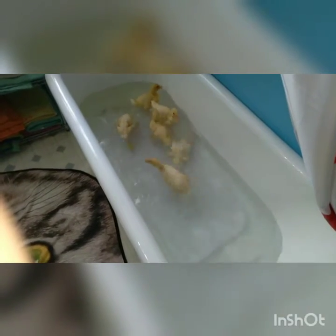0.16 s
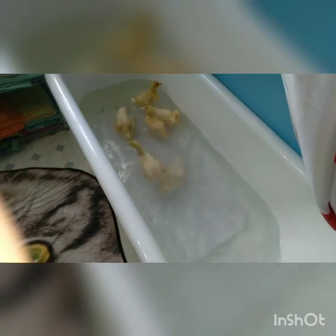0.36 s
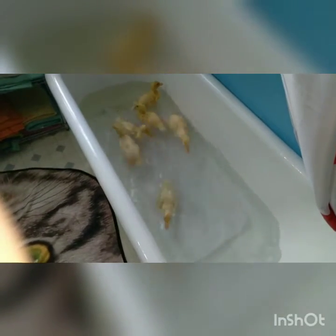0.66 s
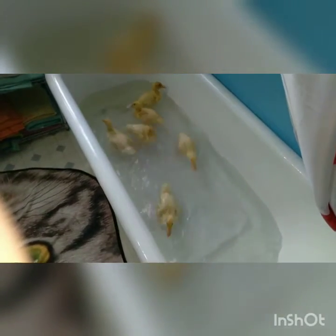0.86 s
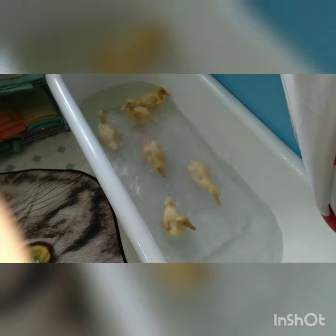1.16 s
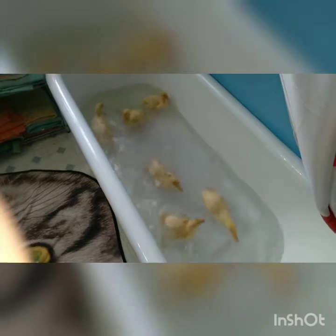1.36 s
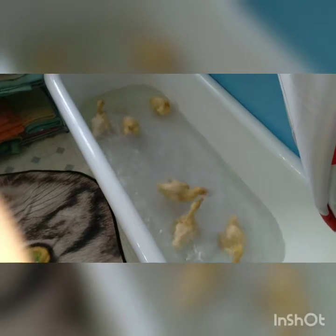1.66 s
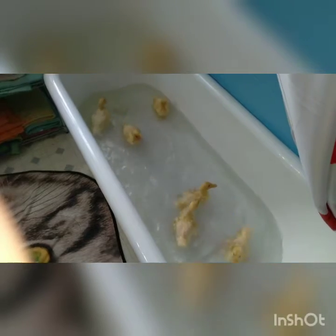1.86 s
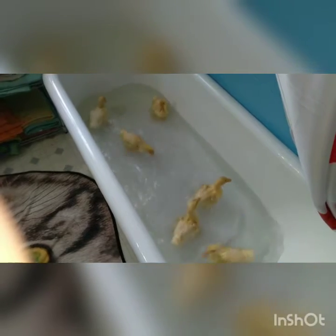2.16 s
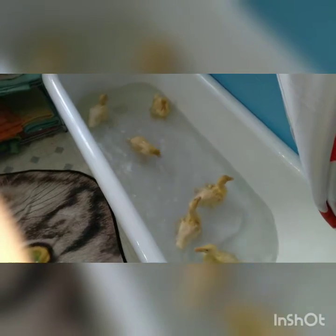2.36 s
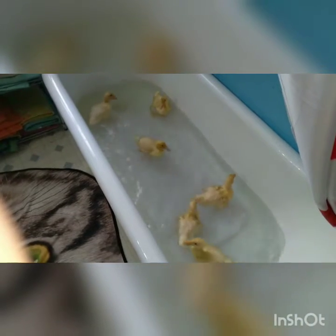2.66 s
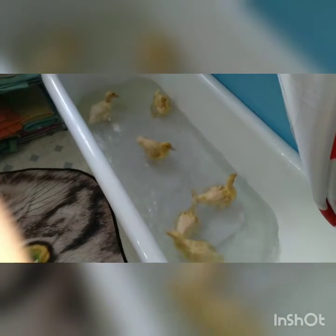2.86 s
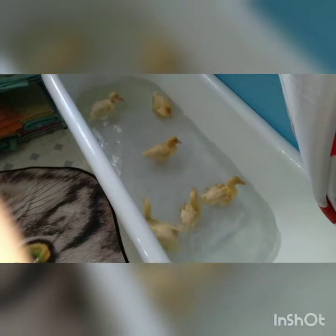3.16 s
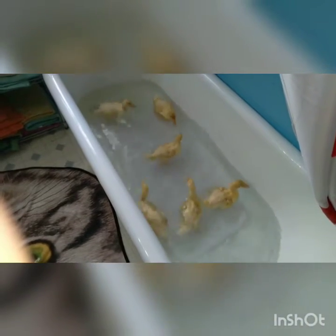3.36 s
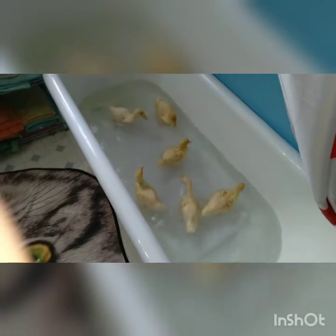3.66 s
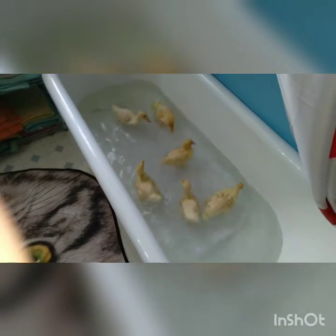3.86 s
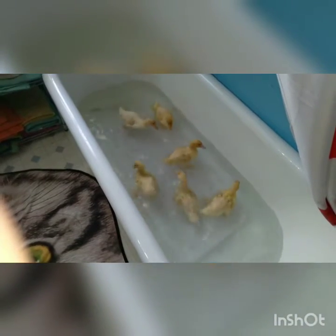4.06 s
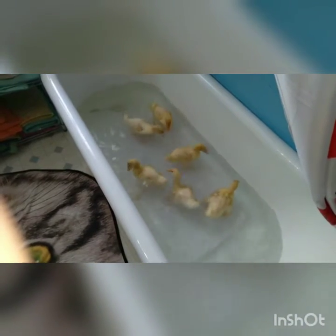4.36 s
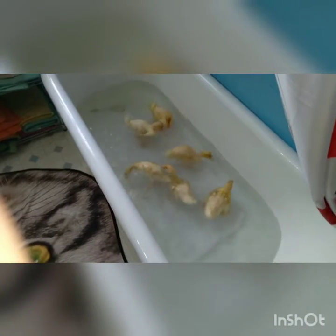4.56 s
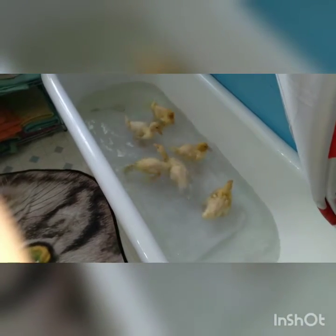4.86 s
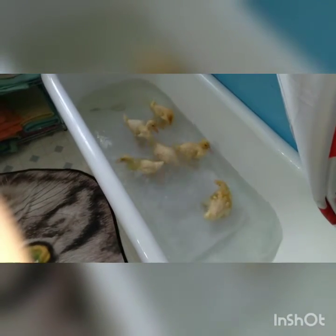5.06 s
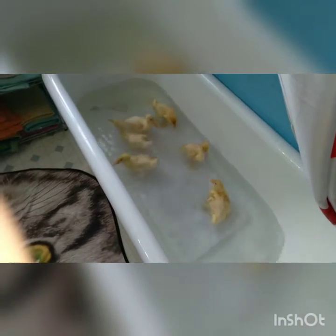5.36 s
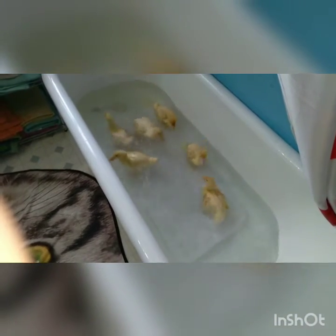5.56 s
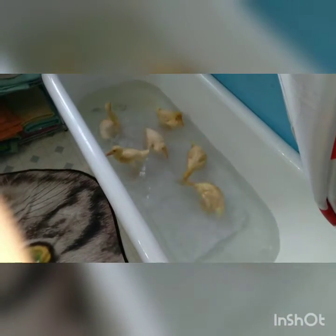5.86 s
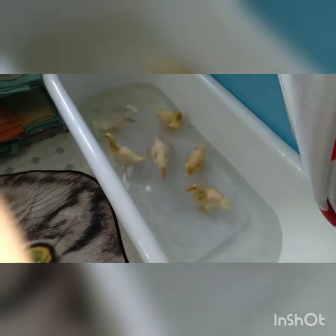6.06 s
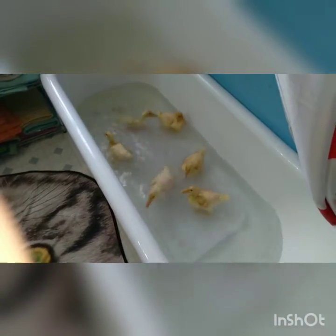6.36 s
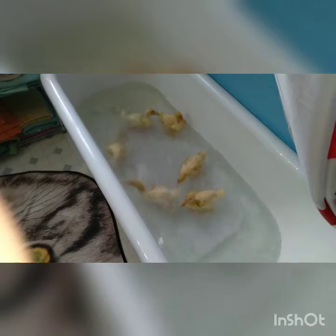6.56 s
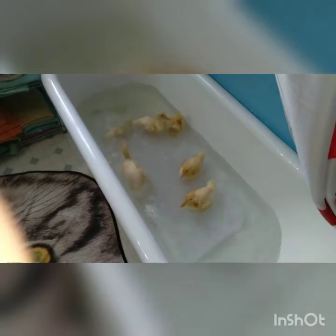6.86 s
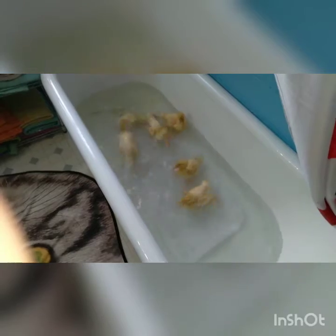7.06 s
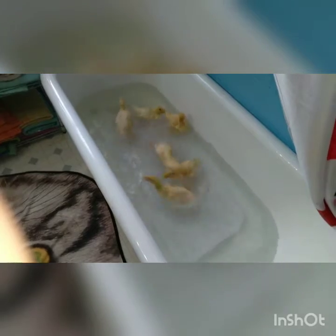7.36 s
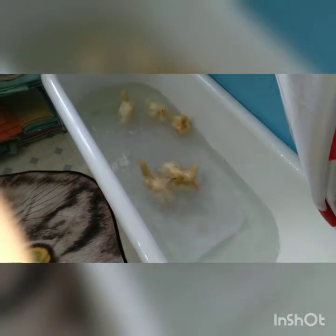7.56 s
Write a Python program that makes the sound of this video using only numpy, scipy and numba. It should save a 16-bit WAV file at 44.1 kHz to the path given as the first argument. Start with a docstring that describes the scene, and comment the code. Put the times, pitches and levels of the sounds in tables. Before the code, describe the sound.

Ducklings peep in short high whistles while paddling and splashing in a shallow bathtub, in a small echoing bathroom.

```python
"""Ducklings peep and splash close by, in a shallow bath in a small hard-walled bathroom.
Each peep is a short whistle that arches up and down in pitch and reaches the pair of microphones
mostly off the walls. Webbed feet throw spray, stir bubbles and kick the water until the tub booms;
single drops smack or plop on the surface. A faint room hush lies underneath."""
import sys
import numpy as np
from scipy import signal
from scipy.fft import rfft, irfft, next_fast_len
from scipy.io import wavfile
from scipy.ndimage import map_coordinates
from numba import njit

SR = 44100
rng = np.random.default_rng(int(sys.argv[2]) if len(sys.argv) > 2 else 0)


def inscribe(sig):
    """Save sig as 16-bit PCM at rate SR to the path in sys.argv[1].

    A 1-D sig is mono; a 2-D sig holds one channel per row.
    Samples are clipped to [-1, 1] before scaling.
    """
    pcm = np.round(np.clip(np.atleast_2d(sig).T, -1, 1) * 32767)
    wavfile.write(sys.argv[1], SR, pcm.astype(np.int16))


N = 339646
TIME = np.arange(N) / SR

# colour of the room's hush: freq_hz, density_db
HUSH_SPECTRUM = [(40, 5), (110, 7), (240, 8.5), (600, -8), (16000, -47)]
# how long the bathroom rings: freq_hz, t60_s
ROOM_DECAY = [(150, 0.67), (2500, 0.27), (12000, 0.25)]
# resonances of the hollow tub: freq_hz, gain_db
TUB_RESONANCES = [(151, 8), (640, 8)]
# the two microphones hear the tub differently: freq_hz, left_minus_right_db
MIC_TILT = [(550, 0.5), (1400, -3), (2900, -4.5), (5500, 5.5), (9000, -4)]
# deep kicks of the feet: start_s, level_db, hold_s
DEEP_KICKS = [(0.013, -39.5, 0.067), (0.713, -47, 0.23), (1.308, -46.5, 0.28), (3.177, -51.5, 0.11),
              (6.195, -48.5, 0.061), (6.55, -39, 0.065), (6.861, -49, 0.2), (7.396, -43, 0.074)]
# colour of the air pockets kicked under: pitch_hz, density_db
BOOM_SPECTRUM = [(55, -16), (100, -6.5), (150, 0), (300, -4.5), (700, -8.5)]
# restless water between bouts of paddling: time_s, fizz_db, bubbling_db
RESTLESS_WATER = [(0.0, -40, -44.5), (1.9, -43, -50.5), (2.22, -49.5, -77.5), (2.5, -64, -59.5),
                  (2.71, -63.5, -88.5), (3.1, -45.5, -62.5), (3.62, -54.5, -50.5), (3.84, -60, -64.5),
                  (4.55, -54, -78.5), (5.3, -40.5, -49), (5.85, -57.5, -71), (6.45, -37.5, -48.5),
                  (7.7, -35.5, -44.0)]
# bouts of paddling: start_s, length_s, spray_db, bubbles_db
PADDLING_BOUTS = [(0.0, 0.12, -35, -45.5), (0.213, 0.08, -33.5, -36.5), (0.472, 0.053, -37.5, -39),
                  (0.641, 0.082, -30.5, -36.5), (1.125, 0.18, -31.5, -38.5), (1.256, 0.32, -31, -41.5),
                  (1.65, 0.13, -37.5, -43), (3.031, 0.09, -36.5, -54.0), (3.124, 0.06, -33.5, -40.5),
                  (3.257, 0.096, -40.5, -44), (3.888, 0.029, -42.5, -76.5), (4.83, 0.16, -43, -59),
                  (5.067, 0.037, -38.5, -48), (5.476, 0.2, -46.5, -56), (5.976, 0.17, -43, -48.5),
                  (6.156, 0.015, -36, -40.5), (6.55, 0.17, -33, -38.5), (6.829, 0.11, -30, -36.5),
                  (7.218, 0.032, -31.5, -36), (7.314, 0.28, -34, -39)]
# colour of the spray: pitch_hz, density_db
SPRAY_SPECTRUM = [(1200, -13.5), (2200, -2), (4300, -4.5), (6500, -9), (10000, -0.5), (13000, -14),
                  (16000, -21)]
# colour of the stirred bubbles: pitch_hz, density_db
FROTH_SPECTRUM = [(380, -11), (650, -5), (1100, -3.5), (2400, -5.5)]
# single large bubbles: start_s, start_pitch_hz, level_db
LARGE_BUBBLES = [(0.111, 1140, -21.5), (0.224, 1944, -18.5), (0.683, 1550, -20), (1.289, 1580, -15),
                 (1.83, 4040, -21.5), (2.449, 616, -31), (3.177, 2262, -17), (5.381, 1790, -21),
                 (7.068, 1273, -19), (7.247, 598, -28.5), (7.347, 1200, -22.5), (7.47, 1897, -15.5),
                 (7.490, 1383, -18.5), (7.577, 2640, -14)]
# drops and feet hitting the water: start_s, level_db, centre_hz
SURFACE_HITS = [(0.049, -24, 10800), (0.231, -18.5, 9400), (0.474, -18.5, 4170), (0.647, -21.5, 5560),
                (0.707, -17, 8265), (1.351, -20, 8550), (1.5215, -13, 6800), (3.135, -18.5, 2380),
                (4.831, -11.5, 10200), (5.028, -10.5, 9950), (5.104, -17.5, 7750), (5.339, -23.5, 5800),
                (5.382, -21.5, 9690), (6.555, -18.5, 10010), (6.65, -18, 9970), (6.716, -15, 9400),
                (6.8325, -15, 9325), (7.247, -11.5, 9750)]
# the calls, levels ahead of the throat's resonance: crest_s, crest_hz, level_db, beak_opening (0-1)
CALLS = [(0.02, 3340, -25.5, 0.67), (0.075, 3072, -24, 0.09), (0.263, 3146, -26.5, 0),
         (0.798, 3004, -23.5, 0.16), (1.033, 3507, -22, 1), (1.243, 2610, -21, 0.41),
         (1.382, 3092, -18.5, 0.6), (1.575, 3356, -18, 1), (1.922, 2457, -35, 0.17),
         (2.008, 3600, -32.5, 0.05), (2.083, 3540, -32, 0), (2.215, 2652, -30, 0.11),
         (2.285, 3426, -30.5, 0.12), (2.615, 2870, -38, 0.05), (2.785, 3080, -38, 0.04),
         (2.822, 2950, -31.5, 0.06), (2.98, 2850, -30, 0), (3.124, 3110, -26.5, 0.09), (3.57, 2594, -38, 0),
         (3.686, 2900, -27, 0.03), (3.749, 3018, -34.5, 0.69), (3.913, 3123, -28.5, 0.01),
         (4.101, 2820, -23.5, 0.17), (4.277, 3077, -26, 0.17), (4.465, 2325, -37, 0),
         (4.655, 3200, -31, 0.06), (4.74, 2787, -31, 0), (4.925, 2920, -33, 0), (5.182, 2890, -32, 0.14),
         (5.292, 2720, -31.5, 0.37), (5.479, 2914, -28.5, 0.05), (5.52, 2950, -28.5, 0.03),
         (5.661, 2404, -33, 0.05), (5.707, 3020, -33, 0.22), (5.846, 2710, -32, 0.08),
         (5.873, 3205, -36.5, 0.63), (5.964, 2645, -36, 0.02), (6.195, 2670, -34, 0.2),
         (6.674, 3352, -31.5, 0.3), (6.886, 2356, -26, 0.15), (7.184, 2820, -29, 0.1),
         (7.355, 2985, -29, 0.3)]
# how the calling bird reaches the microphones: time_s, direct_power_share (0-1), left_minus_right_db
CALL_PATH = [(1.05, 0.13, -0.5), (1.55, 0.17, -1.5), (2.2, 0.31, -8), (2.7, 0.11, -2.5), (3.7, 0, 6),
             (5.5, 0.19, -3)]


def from_db(db):
    """Decibels to gain."""
    return 10 ** (np.asarray(db) / 20)


def unit_rms(x):
    """Scale to unit power."""
    return x / np.sqrt(np.mean(x ** 2) + 1e-20)


def in_time(rows):
    """Columns of a curve table at every sample."""
    times, *columns = np.transpose(rows)
    return [np.interp(TIME, times, column) for column in columns]


def at_hz(points, hz):
    """Read a table along log frequency."""
    freqs, values = np.transpose(points)
    return np.interp(np.log(np.maximum(hz, 1)), np.log(freqs), values)


def coloured(x, spectrum):
    """Shape a sound with a smooth spectrum."""
    size = next_fast_len(x.shape[-1])
    gain = from_db(at_hz(spectrum, np.fft.rfftfreq(size, 1 / SR)))
    return irfft(rfft(x, size) * gain, size)[..., :x.shape[-1]]


def filtered(x, hz, kind, order=2):
    """Butterworth filter."""
    return signal.sosfilt(signal.butter(order, hz, kind, fs=SR, output="sos"), x)


def add(track, start_s, sound):
    """Mix a sound in from start_s."""
    start = int(round(start_s * SR))
    part = sound[max(-start, 0):max(N - start, 0)]
    track[max(start, 0):max(start, 0) + len(part)] += part


def room_hush(level_db=-70.5):
    """Faint low noise of the room, mostly the same at both microphones."""
    noise = rng.standard_normal(N) + .5 * rng.standard_normal((2, N))
    return from_db(level_db) * unit_rms(coloured(noise, HUSH_SPECTRUM))


def bathroom(places, wet_db, apart_hz=700, echo_s=0.018, lag_s=.00015):
    """From each place to the microphones: direct sound, quick echoes, the tub's ring, the room's tail."""
    t = np.arange(SR // 2) / SR
    edges = np.geomspace(60, SR * .45, 9)
    white = rng.standard_normal((2, len(places), len(t)))
    tail = sum(filtered(white, [lo, hi], "band") * from_db(-60 * t / at_hz(ROOM_DECAY, np.sqrt(lo * hi)))
               for lo, hi in zip(edges, edges[1:]))
    tail *= np.minimum(t / echo_s, 1)
    arrivals = rng.random(white.shape) < 2000 / SR
    echoes = rng.standard_normal(white.shape) * arrivals * np.exp(-t / echo_s)
    mid, side = from_db(wet_db) * (unit_rms(echoes) + unit_rms(tail)) / np.sqrt(2 * len(t))
    side = filtered(side, apart_hz, "high", order=1)   # left and right differ above the bass
    for hz, db in TUB_RESONANCES:
        fade = from_db(-60 * t / at_hz(ROOM_DECAY, hz))
        mid = mid + 2 * from_db(db) * np.cos(2 * np.pi * hz * t) * fade / fade.sum()
    response = np.array([mid + side, mid - side])
    # off-centre places reach the nearer microphone first
    for place, lag in enumerate(np.linspace(-lag_s, lag_s, len(places)) * SR):
        response[0, place, int(max(lag, 0))] += 1
        response[1, place, int(max(-lag, 0))] += 1
    response = unit_rms(response) / np.sqrt(len(t))
    return signal.fftconvolve(places[None], response, axes=2)[..., :N].sum(1)


@njit
def ring_bubbles(starts, pitches, sizes, places, cycles, rise):
    """Each trapped bubble rings down, climbing in pitch as it nears the surface; one track a place."""
    out = np.zeros((places.max() + 1, N))
    for start, hz, size, place in zip(starts, pitches, sizes, places):
        length = int(cycles / hz * SR)
        for i in range(min(length, N - start)):
            age = i / length
            turns = hz * i / SR * (1 + rise * age / 2)
            attack = min(turns / (1 + cycles / 12), 1.)
            out[place, start + i] += size * np.sin(2 * np.pi * turns) * np.exp(-7 * age) * attack
    return out


def bubble_swarm(spectrum, level_db, per_s, cycles, rise, spread_db, clump_db=0, clumps_per_s=0):
    """Bubbles born at random at three places; harder stirring makes more and louder ones."""
    crowd = from_db(.42 * (level_db - level_db.max()))
    starts = np.flatnonzero(rng.random(N) < per_s * crowd / SR)
    low_hz, high_hz = spectrum[0][0], spectrum[-1][0]
    pitches = low_hz * (high_hz / low_hz) ** rng.random(N)[starts]
    sizes = from_db(spread_db * np.minimum(rng.exponential(1, N), 3.4))
    sizes = sizes * rng.choice([-1, 1], N) / np.sqrt(crowd)
    # bubbles near in time and pitch are loud or soft together
    time_and_pitch = [starts / SR * clumps_per_s, 2 * np.log2(pitches)]
    clumps = map_coordinates(rng.standard_normal((1024, 32)), time_and_pitch, order=1)
    sizes = sizes[starts] * pitches * from_db(at_hz(spectrum, pitches) + clump_db * clumps)
    swarm = ring_bubbles(starts, pitches, sizes, np.arange(len(starts)) % 3, cycles, rise)
    return from_db(level_db) * unit_rms(swarm) / np.sqrt(3)


def kicks(fade_db_per_s=110):
    """A deep kick drags big pockets of air under, and the tub booms with them."""
    force = sum(from_db(db - fade_db_per_s * np.maximum(TIME - start_s - hold_s, 0)) * (TIME > start_s)
                for start_s, db, hold_s in DEEP_KICKS)
    pockets = bubble_swarm(BOOM_SPECTRUM, np.zeros(N), per_s=500, cycles=13.5, rise=0.088,
                           spread_db=3, clump_db=-1, clumps_per_s=8.3)
    return bathroom(force * pockets, wet_db=-8.5)


def stirred_db(rest_db, bouts, fade_db_per_s, attack_s=.01):
    """Level of restless water with bouts on top: each swells quickly, holds, then settles."""
    age = np.arange(SR) / SR
    swell = np.minimum(age / attack_s, 1)
    power = from_db(rest_db) ** 2
    for start_s, length_s, db in bouts:
        bout = swell * from_db(db - fade_db_per_s * np.maximum(age - length_s, 0))
        add(power, start_s, bout ** 2)
    return 10 * np.log10(power)


def paddling():
    """Webbed feet throw a crackle of droplets and stir up bubbles; between bouts the water fizzes on."""
    fizz_db, bubbling_db = in_time(RESTLESS_WATER)
    start_s, length_s, thrown_db, trapped_db = np.transpose(PADDLING_BOUTS)
    spray_db = stirred_db(fizz_db, zip(start_s, length_s, thrown_db), fade_db_per_s=104.5)
    froth_db = stirred_db(bubbling_db, zip(start_s, length_s, trapped_db), fade_db_per_s=86)
    spray = bubble_swarm(SPRAY_SPECTRUM, spray_db, per_s=3400, cycles=12.8, rise=0.046,
                         spread_db=2.5, clump_db=4.5, clumps_per_s=60)
    froth = bubble_swarm(FROTH_SPECTRUM, froth_db, per_s=340, cycles=26.2, rise=0.4, spread_db=3)
    return bathroom(spray, wet_db=2.5) + bathroom(froth, wet_db=-0.6)


def plops():
    """Now and then a foot or a drop traps one large bubble."""
    start_s, pitch_hz, level_db = np.transpose(LARGE_BUBBLES)
    starts = (start_s * SR).astype(np.int64)
    places = np.arange(len(starts)) % 3
    rings = ring_bubbles(starts, pitch_hz, from_db(level_db), places, cycles=62., rise=0.466)
    return bathroom(rings, wet_db=0)


def smacks(width_octaves=0.25, skirt_db=-15, decay_s=.0022, low_hz=700):
    """Each hit on the water is a brief splat, strongest around its own pitch, with a weak broad skirt."""
    places = np.zeros((3, N))
    t = np.arange(SR // 20) / SR
    hz = np.geomspace(low_hz, SR / 2, 60)
    for k, (start_s, db, centre_hz) in enumerate(SURFACE_HITS):
        power = np.exp(-(np.log2(hz / centre_hz) / width_octaves) ** 2) + from_db(skirt_db) ** 2
        splat = coloured(rng.standard_normal(len(t)), np.column_stack([hz, 10 * np.log10(power)]))
        add(places[k % 3], start_s, from_db(db) * unit_rms(splat) * np.exp(-t / decay_s))
    return bathroom(filtered(places + 1e-18, low_hz, "high"), wet_db=0.5)


def peep(crest_hz, opening, foot_hz=1700, fall_ratio=0.72, waver=0.013, shimmer_db=0.5, rasp_rad=0.49):
    """A whistle arches through the throat's resonance; an open beak makes it shorter and brighter."""
    rise_s = .0335 * np.sqrt((crest_hz - foot_hz) / 1000) * (1 - .2 * opening)   # higher takes longer
    t = np.arange(-2 * rise_s, 2 * rise_s, 1 / SR)
    from_crest = np.abs(t) / np.where(t < 0, rise_s, rise_s * fall_ratio)   # 1 at either foot
    knot_s = np.linspace(t[0], t[-1], 130)
    tremor, flutter = [np.interp(t, knot_s, knots) for knots in rng.standard_normal((2, 130))]
    hz = (crest_hz - (crest_hz - foot_hz) * from_crest ** 2) * (1 + waver * tremor)
    phase = 2 * np.pi * np.cumsum(hz) / SR
    # soft peeps sound mostly on their flanks, where the pitch crosses the resonance
    throat_hz, width_hz = 2420 + 900 * opening, 300 * (1 + opening)
    throat = 1 / np.sqrt(1 + ((hz - throat_hz) / width_hz) ** 4)
    pressure = np.exp(-(from_crest / 1.4) ** 6 - (1400 / np.maximum(hz, 500)) ** 8)
    pressure *= from_db(shimmer_db * flutter)
    crest = np.exp(-2 * from_crest ** 2)
    rasp = rasp_rad * flutter
    overtones = np.sin(2 * phase + rasp) + from_db(-13) * np.sin(3 * phase + 2 * rasp)
    whistle = np.sin(phase) + from_db(-20 + 13 * opening) * crest * overtones
    # the other side of the syrinx adds a faint, higher voice at the crest
    second_voice = from_db(-26) * (1 - opening) * crest ** 2 * np.sin(1.22 * phase + rasp_rad * tremor)
    return pressure * (throat * whistle + second_voice)


def ducklings():
    """Peeps from four places in the tub arrive partly straight from the beak, mostly off the walls."""
    places = np.zeros((4, N))
    for k, (crest_s, crest_hz, db, opening) in enumerate(CALLS):
        call = from_db(db) * peep(crest_hz, opening)
        add(places[k % 4], crest_s - len(call) / SR / 2, call)
    direct_share, pan_db = in_time(CALL_PATH)
    straight = np.sqrt(direct_share) * places.sum(0) * from_db(np.array([pan_db, -pan_db]) / 2)
    return straight + bathroom(np.sqrt(1 - direct_share) * places, wet_db=32)


def scene():
    """Birds and water, heard from beside the tub over the hush of the room."""
    return ducklings() + paddling() + kicks() + smacks() + plops() + room_hush()


def record(dry, low_hz=65, top_hz=16200):
    """Two small microphones, each with its own colour, lose the deep bass; the top is cut steeply."""
    pair = np.array([coloured(channel, MIC_TILT * np.array([1, side / 2]))
                     for channel, side in zip(dry, (1, -1))])
    top_cut = signal.ellip(10, .2, 80, top_hz, fs=SR, output="sos")
    return signal.sosfilt(top_cut, filtered(pair, low_hz, "high"))


dry = scene()
out = record(dry)
inscribe(out)
```